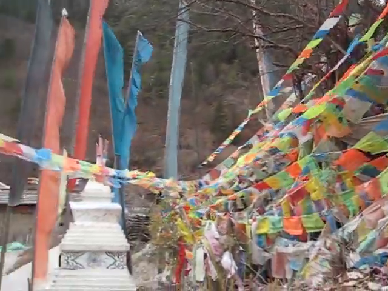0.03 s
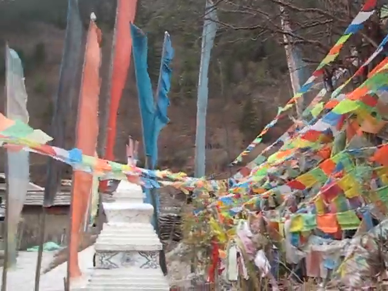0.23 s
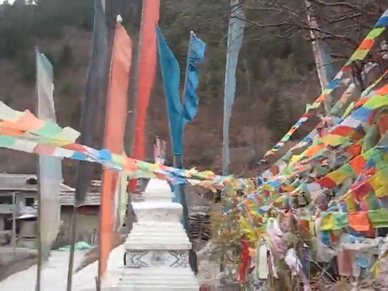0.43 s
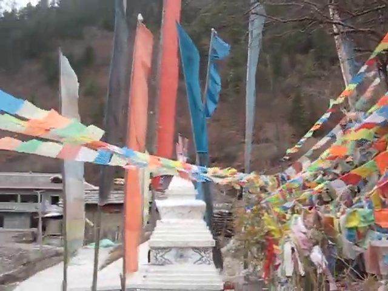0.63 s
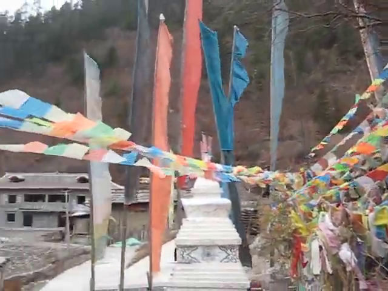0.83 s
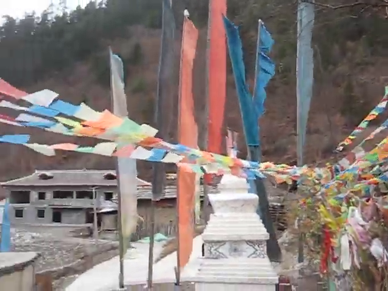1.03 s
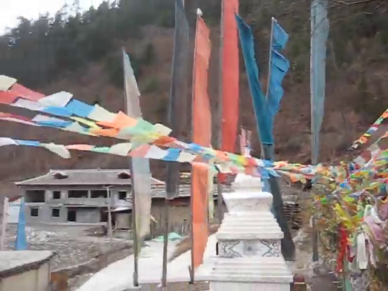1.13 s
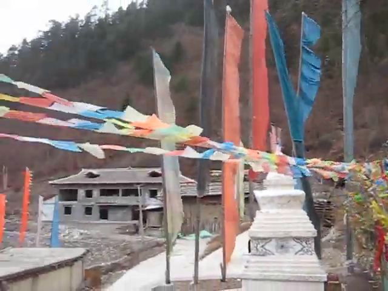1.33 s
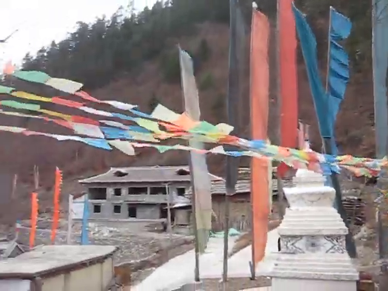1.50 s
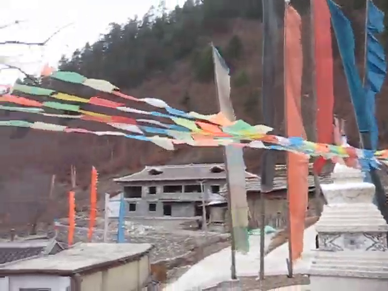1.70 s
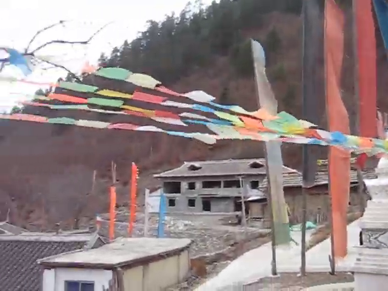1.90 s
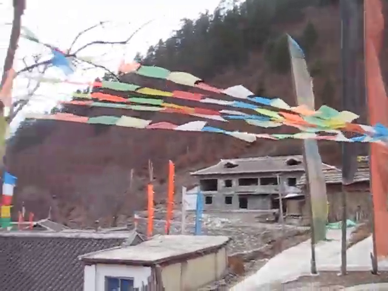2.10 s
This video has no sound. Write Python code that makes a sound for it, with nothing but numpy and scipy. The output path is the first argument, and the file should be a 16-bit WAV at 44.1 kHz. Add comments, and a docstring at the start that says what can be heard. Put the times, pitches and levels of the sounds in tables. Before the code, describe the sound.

Wind buffets a bare microphone outdoors over a steady, soft rush of distant air and faint thin hiss. Dull, bumpy thumps cluster from 0.25 to 0.4 seconds with tiny cloth ticks, again near 0.52, then scatter from 0.8 to 1.06 and thud at 1.27. After a lull, close flags snap and rustle brightly around 1.65-1.7, flap again near 1.78, then fade with small crisp ticks until about 2.1.

```python
"""Wind on a hillside thumps on the microphone: lopsided pressure puffs for single eddies, a stream
of coloured clicks for small swirls, and noise for the deep rumble. Cloth flags close by rustle,
flap and snap, most of all in the later part: crackling creases, band-passed bursts and soft beats.
Distant air rushes steadily as shaped noise; the recorder adds a thin hiss and whine."""
import sys
import numpy as np
from scipy import signal
from scipy.fft import rfft, irfft
from scipy.io import wavfile

SR = 44100
rng = np.random.default_rng(int(sys.argv[2]) if len(sys.argv) > 2 else 0)


def wav_out(sig):
    """Save sig, one row per channel (or a flat mono array), as 16-bit PCM at SR to the path in sys.argv[1]."""
    wavfile.write(sys.argv[1], SR, np.round(np.clip(np.atleast_2d(sig).T, -1, 1) * 32767).astype(np.int16))


N = 94815
TIME = np.arange(N) / SR

# All spectra are relative: the sound is brought to unit rms after shaping.
# Colour of the distant wind: (frequency [Hz], density [dB per Hz])
AIR_SPECTRUM = [(30, -9.5), (100, -15), (250, -6.5), (450, -3.5), (720, -1), (1250, -2.5), (1800, -8),
                (2600, -15.5), (4500, -19.5), (7000, -21.5), (10000, -26.5), (13000, -28), (16000, -38)]
# Strength of the distant wind before its waver: (time [s], level [dB])
AIR_LEVEL = [(0, -41), (.7, -40.5), (1.2, -41.5), (1.8, -40), (2.15, -41)]
AIR_WAVER_DB, AIR_WAVER_HZ = 0.77, 8  # spread and upper rate of the level waver

# Swells of rustling cloth, before resonance: (time of top [s], level [dB], rise [s], fall [s])
FLAPS = [(0.274, -45.5, .022, 0.014), (1.111, -47, 0.018, 0.017), (1.533, -38.5, 0.017, 0.017),
         (1.576, -41, 0.0044, 0.034), (1.656, -38.5, 0.056, 0.0097), (1.683, -24.5, 0.012, 0.012),
         (1.749, -36, 0.028, 0.017), (1.7787, -31.5, .0006, 0.0097), (1.795, -31.5, 0.005, 0.013),
         (1.862, -40, 0.034, 0.037), (1.905, -37, 0.0094, 0.032), (2.006, -43.5, 0.022, 0.023),
         (2.097, -43, 0.011, 0.0094)]
# Cloth pulling taut, level before the band-pass:
# (time [s], level [dB], lower edge [Hz], upper edge [Hz], fall [ms])
SNAPS = [(.2765, -30.5, 4970, 12000, 1.4), (0.2852, -28.5, 5500, 14000, 0.98),
         (0.3139, -28, 4900, 8150, 1.7), (0.326, -37.5, 2800, 9000, 2.9), (1.365, -27, 2300, 3150, 3.8),
         (1.6499, -13.5, 4030, 12600, .5), (1.667, -19, 1000, 9050, 2.9), (1.678, -17, 2020, 8050, 2.6),
         (1.682, -21, 2470, 6500, 2.2), (1.778, -29.5, 900, 8000, 2.2), (1.7925, -25, 1500, 8000, 1.3),
         (1.898, -27, 2000, 10900, 2.4), (2.002, -24.5, 7400, 13000, 1.4),
         (2.0117, -22.5, 6850, 12900, 1.3), (2.0944, -26, 4800, 11900, 0.96)]
# Colour of creasing and snapping cloth: (frequency [Hz], density [dB per Hz])
CLOTH_SPECTRUM = [(100, -20), (220, 11), (450, -12), (1000, 0), (1500, 2), (2500, 1), (3100, 2),
                  (6300, 1.5), (10500, -3.5), (13000, -9.5), (16000, -21)]
# Narrow resonances of the microphone housing, rung by rustle and snaps,
# relative to RESONANCE_DB: (frequency [Hz], level [dB])
HOUSING_RESONANCES = [(2866, 1), (3092, 2), (3206, 2), (3467, 0), (5600, -5), (6050, -2), (6497, -3),
                      (7342, -4)]
# Soft beats of whole flags: (time [s], level [dB], pitch [Hz], half-length [ms])
BILLOWS = [(1.629, -30, 297, 5.1), (1.672, -35, 187, 5.8), (1.731, -31, 302, 6.3), (1.752, -56, 240, 4.5)]
CREASES_PER_S, CREASE_SPREAD_DB = 2500, 2  # clicks in each band before filtering
FLUTTER_HZ, FLUTTER_DB = 160, 1.66  # upper rate and spread of the flutter
SNAP_RISE_S = 0.000094
RESONANCE_WIDTH_HZ, RESONANCE_DB = 28, -5

# Eddies hitting the microphone, level before EDDY_GAIN_DB and filtering:
# (time [s], level [dB], pitch [Hz], half-length [ms])
EDDIES = [(.082, -34.5, 213, 5.5), (.199, -30.5, 328, 2.4), (.2425, -26, 328, 2.2),
          (.2518, -16.5, 326, 1.7), (.2603, -17, 320, 1.14), (.2809, -13, 400, 0.75),
          (.2851, -14.5, 240, 2.4), (.2965, -23, 200, 1.7), (.3354, -12, 895, 0.76), (.3372, -10, 625, 1.1),
          (.3402, -16, 280, 2.3), (.3467, -12.5, 540, 1.1), (.3530, -13, 382, 1.4),
          (.3664, -14.5, 352, 1.5), (.3815, -17, 440, 1.7), (.4106, -13.5, 410, 1.22),
          (.455, -27.5, 350, 1.5), (.497, -32, 230, 5), (.5163, -14.5, 410, 0.74),
          (.5188, -11.5, 434, 0.62), (.5216, -9, 720, 0.72), (.5218, -15, 333, 3.6), (.538, -24, 280, 2),
          (.5917, -18, 305, 3), (.6165, -27, 360, 2.5), (.6511, -18.5, 480, 0.76), (.6906, -21, 350, 1.15),
          (.704, -30.5, 328, 1.3), (.8060, -18.5, 270, 1.4), (.8163, -13.5, 447, 1.7),
          (.8688, -22.5, 322, 0.58), (.8815, -19.5, 370, 1.14), (.9522, -17.5, 364, 1.96),
          (1.0052, -14, 425, 1.58), (1.0228, -27.5, 376, 1.6), (1.0299, -19.5, 343, 2.5),
          (1.0443, -20.5, 260, 3.1), (1.0564, -16, 410, 0.89), (1.2535, -27, 370, 2.8),
          (1.2594, -18.5, 446, 0.44), (1.2664, -9, 425, 0.9), (1.2700, -19, 230, 2.8)]
# Strength of the small swirls before the low cut: (time [s], level [dB])
GUST_LEVEL = [(0, -67), (.08, -39), (.15, -49.5), (.23, -42), (.37, -31), (.45, -38), (.53, -34.5),
              (.67, -38.5), (.76, -48), (.82, -36), (.92, -40), (1.04, -34.5), (1.15, -51), (1.23, -52),
              (1.28, -37.5), (1.45, -73), (1.75, -40), (2.15, -78)]
# Colour of the small swirls: (frequency [Hz], density [dB per Hz])
SWIRL_SPECTRUM = [(30, -34), (70, -8), (130, 3), (250, 1), (420, -7.5), (700, -11.5), (1400, -33),
                  (3000, -70)]
# Strength of the deep rumble: (time [s], level [dB])
RUMBLE_LEVEL = [(0, -38.5), (.1, -55), (.15, -64), (.22, -36), (.38, -69), (.76, -55), (1.0, -43),
                (1.17, -56), (1.37, -42.5), (1.51, -58.5), (1.65, -55), (1.94, -49), (2.04, -72)]
# Colour of the deep rumble: (frequency [Hz], density [dB per Hz])
RUMBLE_SPECTRUM = [(15, 16), (35, -3), (70, 13), (110, 8), (180, 6), (400, -35)]
EDDY_GAIN_DB, EDDY_TOP_HZ = 0.5, 1450
PUFF_ROUGHNESS, PUFF_LOPSIDED_RAD = 0.12, 0.2  # raggedness, spread of the phase at the puff's middle
SWIRLS_PER_S, SWIRL_SPREAD_DB = 700, 3.5
WIND_LOW_CUT_HZ = 43  # eddies and swirls only

# Colour of the recorder's hiss before its low cut: (frequency [Hz], density [dB per Hz])
HISS_SPECTRUM = [(11000, -40), (13300, -16), (14100, 9), (14700, 14), (15300, -10), (16000, -16)]
HISS_DB, HISS_LOW_CUT_HZ = -60, 11000  # level before its low cut and the recorder's top cut
WHINE_HZ, WHINE_DB, WHINE_WAVER_HZ = 15140, -71, 12
CUTOFF_HZ = 15750


def from_db(db):
    """Decibels to gain."""
    return 10 ** (np.asarray(db) / 20)


def rms_one(x):
    """Scale to unit rms."""
    return x / np.sqrt(np.mean(x ** 2) + 1e-20)


def level(rows):
    """Gain over time, drawn straight in dB between (time [s], level [dB]) rows."""
    return from_db(np.interp(TIME, *np.transpose(rows)))


def butter(x, hz, kind, order=2):
    """Causal low-, high- or band-pass."""
    edges = np.clip(hz, 10, 0.45 * SR)
    sections = signal.butter(order, edges, kind, fs=SR, output="sos")
    return signal.sosfilt(sections, x + 1e-18)


def coloured(x, spectrum):
    """Give a flat signal a spectrum, drawn over log frequency; rms 1."""
    hz, db = np.transpose(spectrum)
    bins = np.maximum(np.arange(N // 2 + 1) * SR / N, 1)
    gain = from_db(np.interp(np.log(bins), np.log(hz), db))
    return rms_one(irfft(rfft(x) * gain, N))


def noise(spectrum):
    """Smooth noise with a spectrum."""
    return coloured(rng.standard_normal(N), spectrum)


def drift(rate_hz):
    """Random wander below a rate, spread about 1."""
    wander = butter(rng.standard_normal(N + SR), rate_hz, "low")
    return rms_one(wander[SR:])  # skip the filter's start


def grains(per_s, spread_db):
    """Random clicks of uneven size and either sign."""
    sizes = from_db(spread_db * np.minimum(rng.exponential(1, N), 4))
    signs = rng.choice([-1, 1], N)
    struck = rng.random(N) < per_s / SR
    return sizes * signs * struck


def swell(top_s, rise_s, fall_s):
    """Exponential rise to a top, then exponential fall."""
    return np.exp(-np.maximum((top_s - TIME) / rise_s, (TIME - top_s) / fall_s))


def puffs(rows):
    """Puffs of air: each a short, slightly ragged pressure swing under a bell-shaped envelope."""
    out = np.zeros(N)
    ragged = drift(EDDY_TOP_HZ)
    for s, db, hz, half_ms in rows:
        phase = PUFF_LOPSIDED_RAD * rng.standard_normal()
        swing = np.cos(2 * np.pi * hz * (TIME - s) + phase)
        half_s = half_ms / 1000
        envelope = 1 / np.cosh(np.clip(np.pi / 2 * (TIME - s) / half_s, -20, 20))
        out += from_db(db) * envelope * (swing + PUFF_ROUGHNESS * ragged)
    return out


def distant_air():
    """Distant turbulence blends into an even rush of noise with a gently wavering level."""
    waver = from_db(AIR_WAVER_DB * drift(AIR_WAVER_HZ))
    return level(AIR_LEVEL) * waver * noise(AIR_SPECTRUM)


def creases():
    """Tiny buckles in the cloth click at random; each frequency band flutters on its own."""
    edges = np.geomspace(100, 16000, 9)
    crackle = np.zeros(N)
    for low_hz, high_hz in zip(edges, edges[1:]):
        flutter = from_db(FLUTTER_DB * drift(FLUTTER_HZ))
        clicks = grains(CREASES_PER_S, CREASE_SPREAD_DB)
        crackle += flutter * butter(clicks, [low_hz, high_hz], "band")
    return crackle


def rustle():
    """Moving cloth creases: the crackle swells with every flap."""
    power = sum((from_db(db) * swell(s, rise_s, fall_s)) ** 2 for s, db, rise_s, fall_s in FLAPS)
    return np.sqrt(power) * coloured(creases(), CLOTH_SPECTRUM)


def snaps():
    """Cloth pulled taut cracks: noise jumps up, dies fast and keeps to one band."""
    crack = noise(CLOTH_SPECTRUM)
    out = np.zeros(N)
    for s, db, low_hz, high_hz, fall_ms in SNAPS:
        burst = crack * swell(s, SNAP_RISE_S, fall_ms / 1000)
        out += from_db(db) * butter(burst, [low_hz, high_hz], "band")
    return out


def housing_resonances(cloth):
    """The microphone housing rings at narrow resonances, driven by the rustle and snaps."""
    ringing = np.zeros(N)
    for hz, db in HOUSING_RESONANCES:
        b, a = signal.iirpeak(hz, hz / RESONANCE_WIDTH_HZ, fs=SR)
        ringing += from_db(db) * signal.lfilter(b, a, cloth)
    return from_db(RESONANCE_DB) * ringing


def flags():
    """Flags rustle and snap, and the housing rings along; whole flags beat the air softly."""
    cloth = rustle() + snaps()
    return cloth + housing_resonances(cloth) + puffs(BILLOWS)


def wind_on_microphone():
    """Single strong eddies ride on a stream of small swirls and a deep rumble."""
    eddies = from_db(EDDY_GAIN_DB) * butter(puffs(EDDIES), EDDY_TOP_HZ, "low", order=5)
    swirls = level(GUST_LEVEL) * coloured(grains(SWIRLS_PER_S, SWIRL_SPREAD_DB), SWIRL_SPECTRUM)
    rumble = level(RUMBLE_LEVEL) * noise(RUMBLE_SPECTRUM)
    return butter(eddies + swirls, WIND_LOW_CUT_HZ, "high") + rumble


def scene():
    """All sources add up at one microphone."""
    mix = distant_air() + flags() + wind_on_microphone()
    return mix[None]  # one channel


def record(dry):
    """The recorder adds its hiss and a wavering sine whine, then cuts the top steeply."""
    hiss = from_db(HISS_DB) * butter(noise(HISS_SPECTRUM), HISS_LOW_CUT_HZ, "high")
    pitch_hz = WHINE_HZ + WHINE_WAVER_HZ * drift(20)
    whine = np.sqrt(2) * np.sin(2 * np.pi * np.cumsum(pitch_hz) / SR)  # rms 1
    top_cut = signal.ellip(12, 0.1, 90, CUTOFF_HZ, fs=SR, output="sos")
    return signal.sosfilt(top_cut, dry + hiss + from_db(WHINE_DB) * whine)


dry = scene()
out = record(dry)
wav_out(out)
```